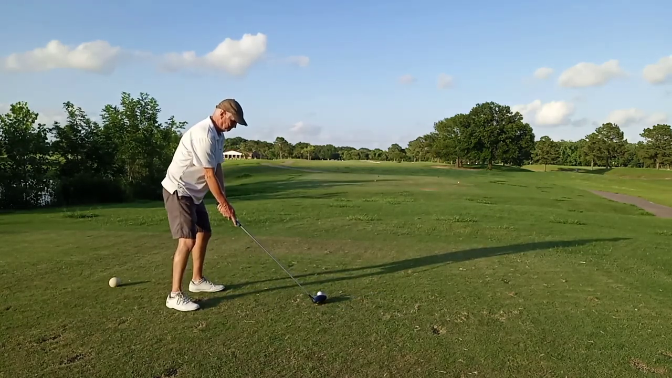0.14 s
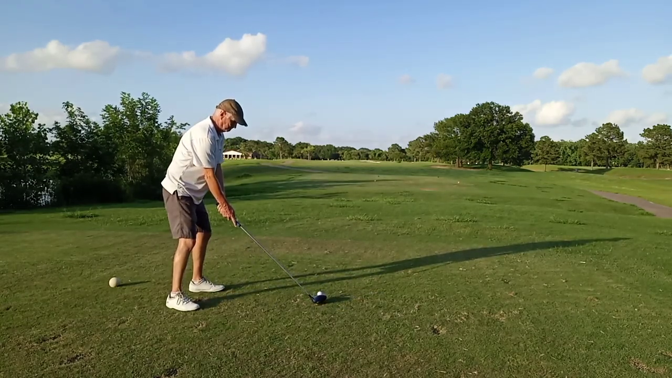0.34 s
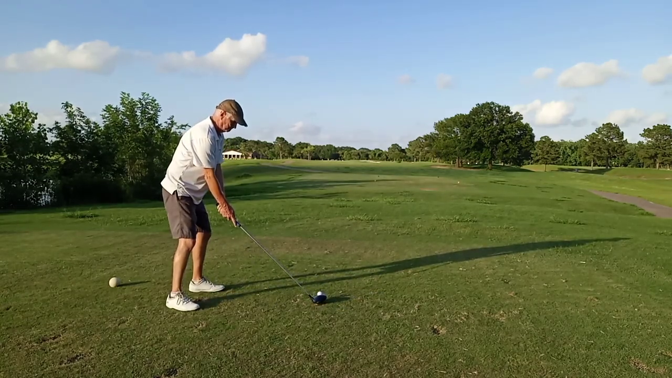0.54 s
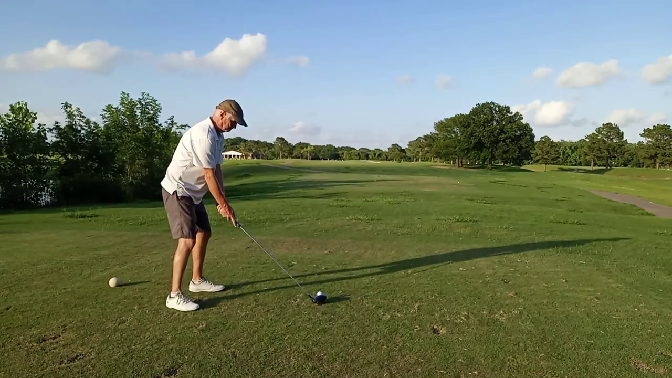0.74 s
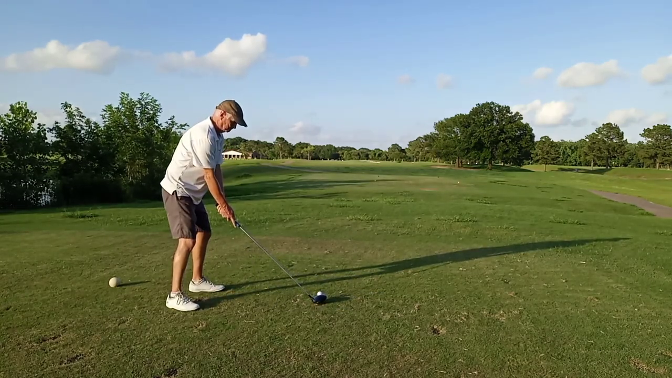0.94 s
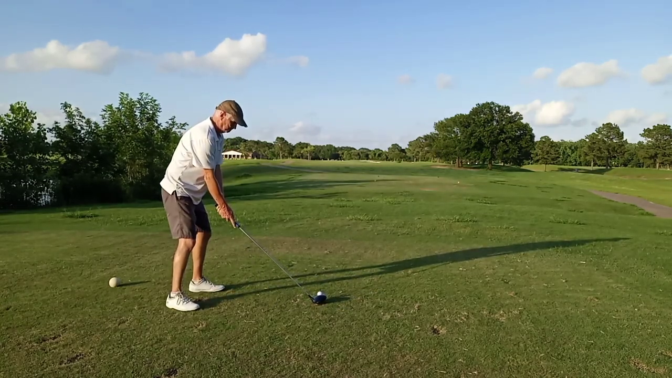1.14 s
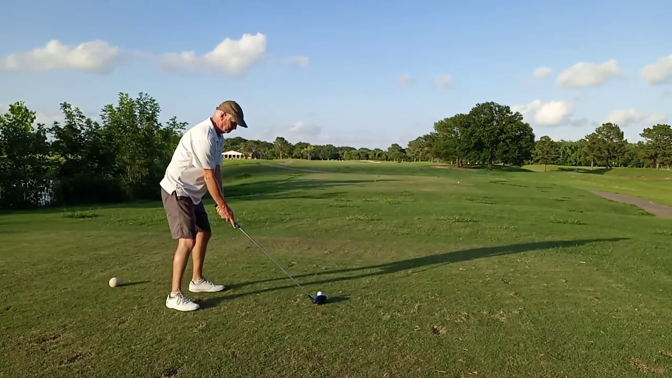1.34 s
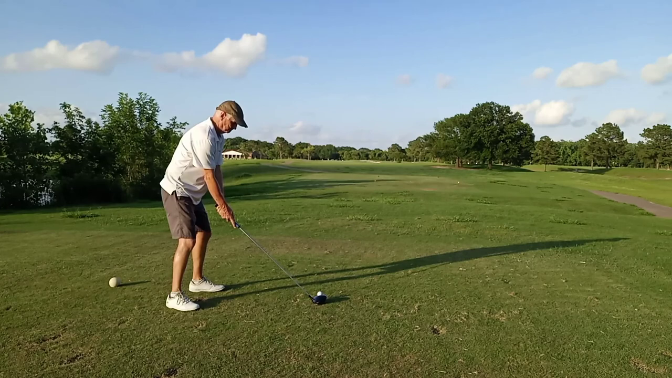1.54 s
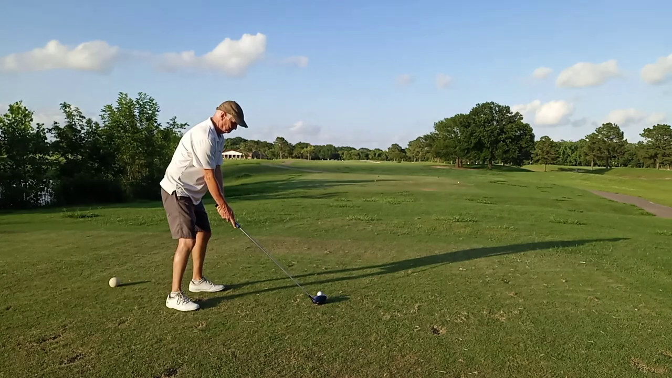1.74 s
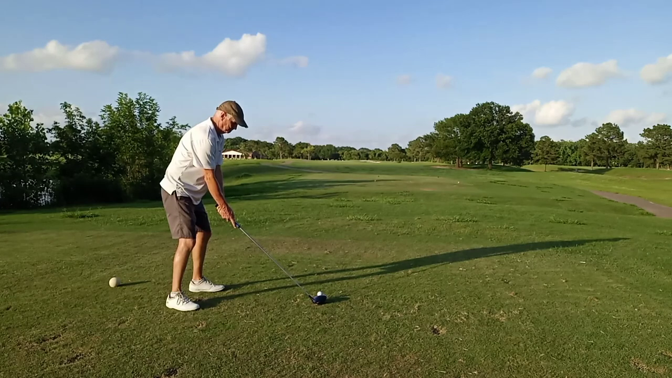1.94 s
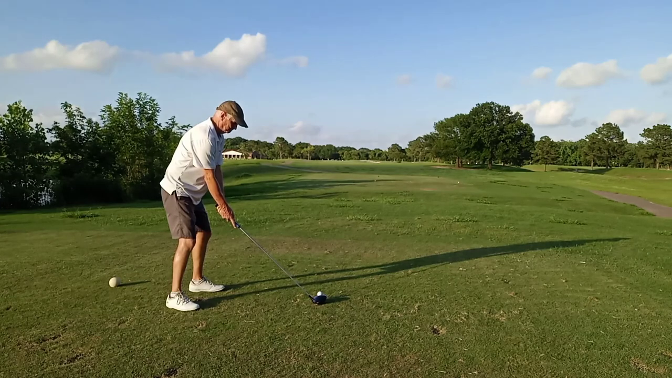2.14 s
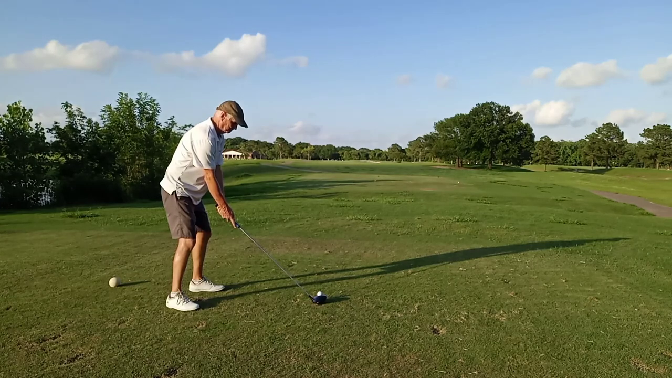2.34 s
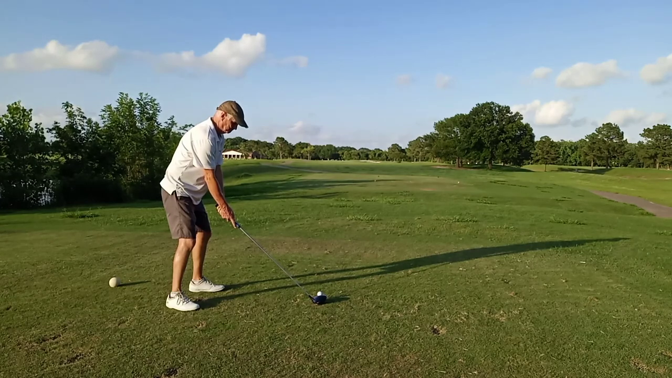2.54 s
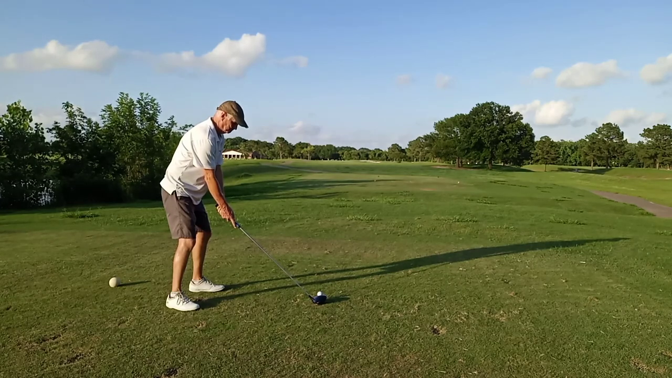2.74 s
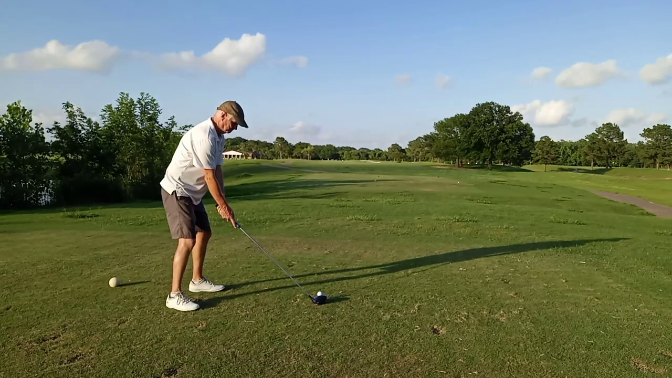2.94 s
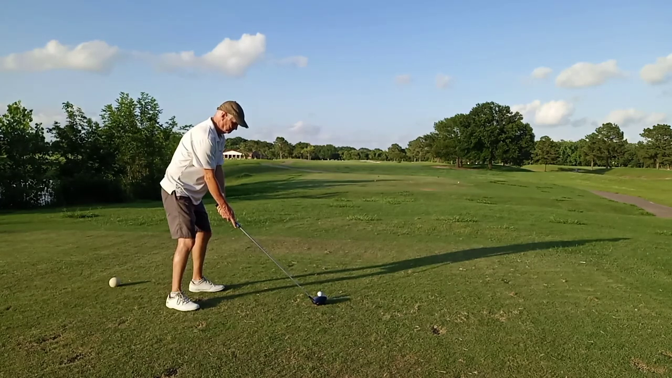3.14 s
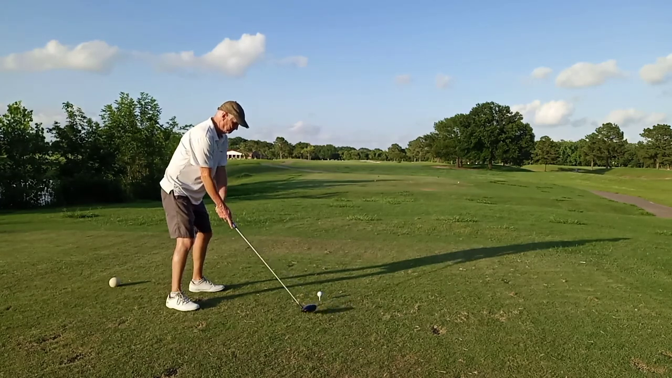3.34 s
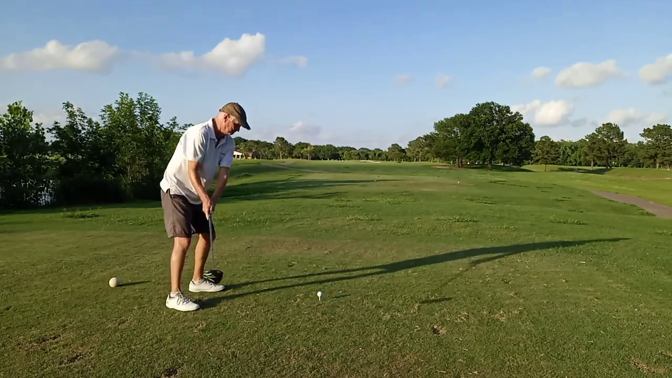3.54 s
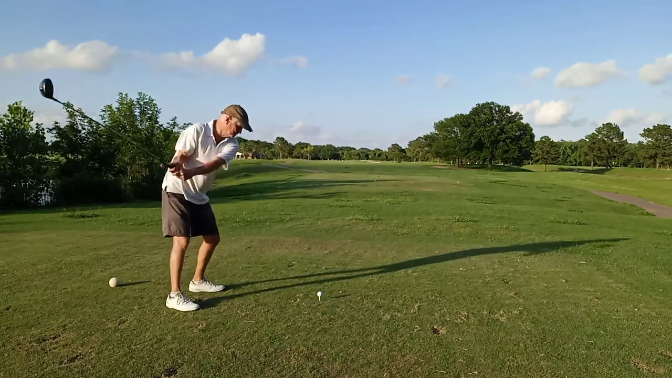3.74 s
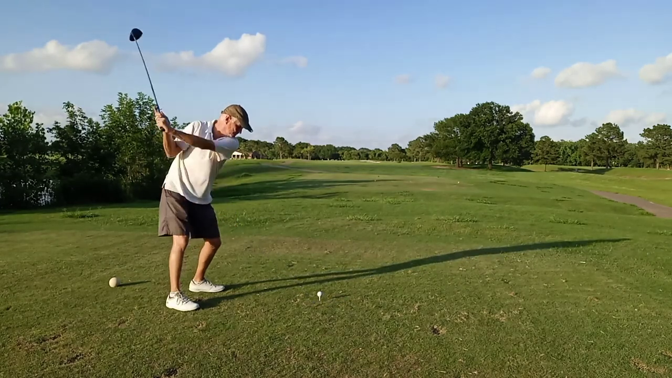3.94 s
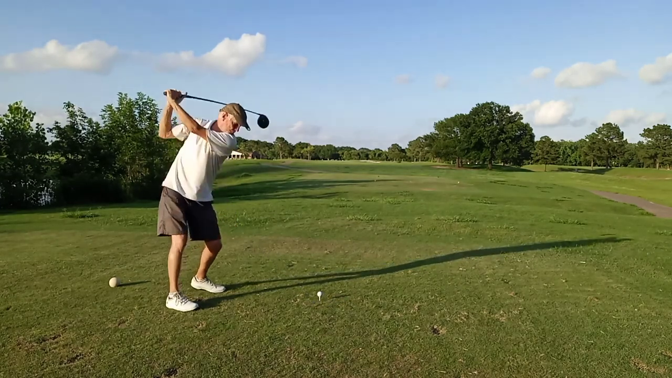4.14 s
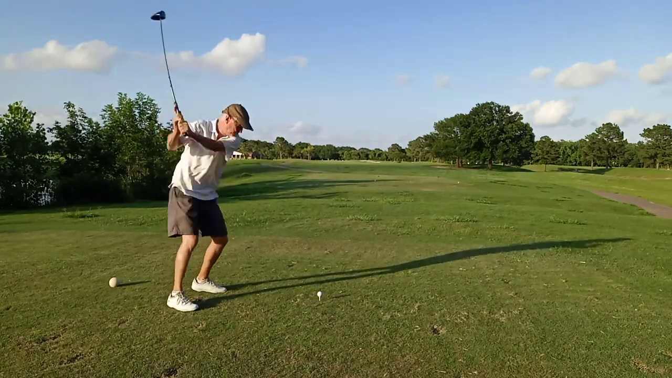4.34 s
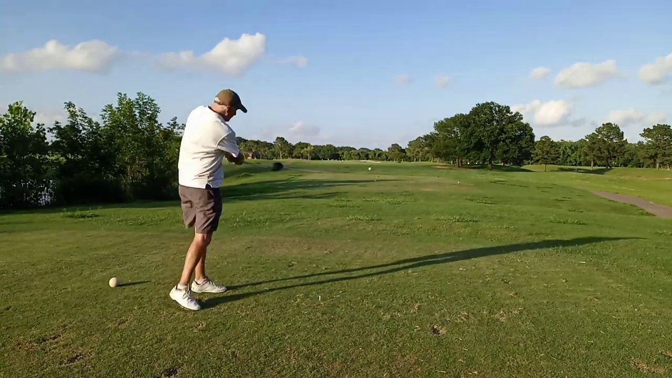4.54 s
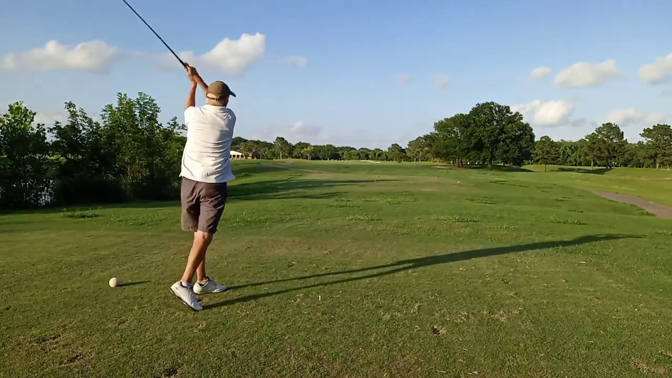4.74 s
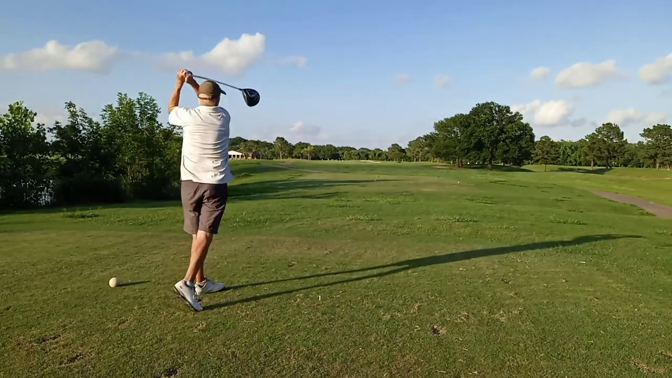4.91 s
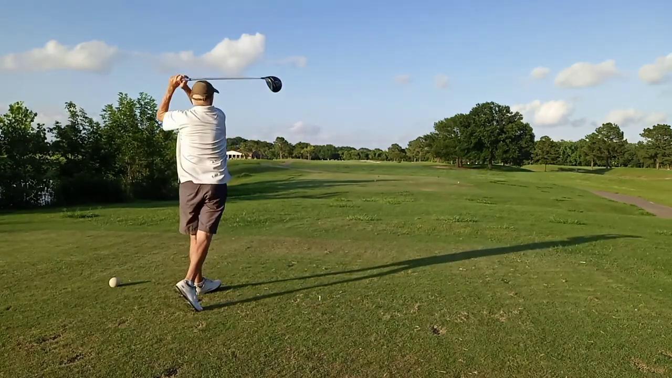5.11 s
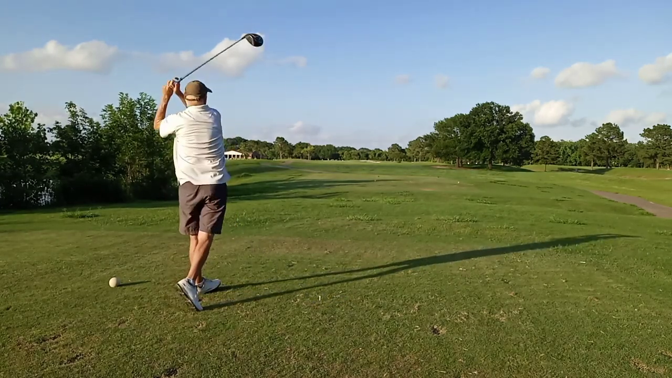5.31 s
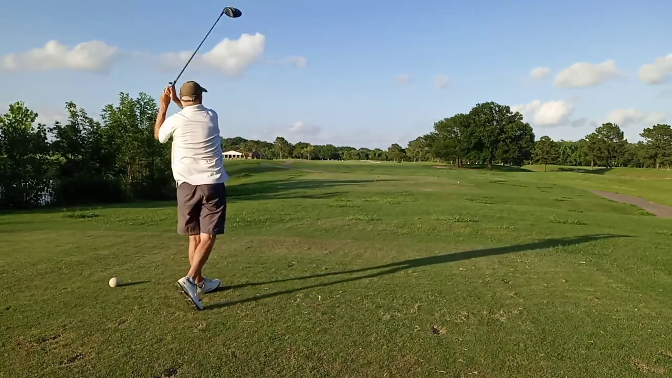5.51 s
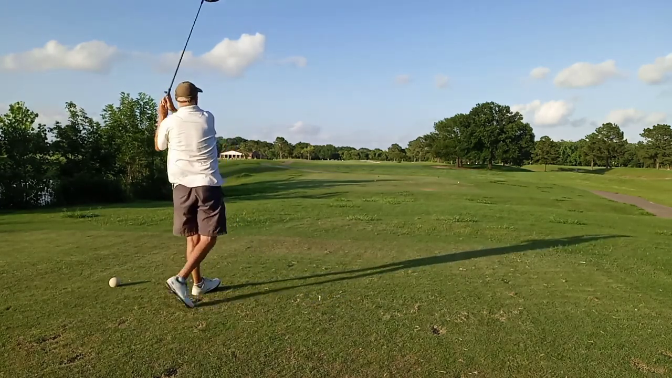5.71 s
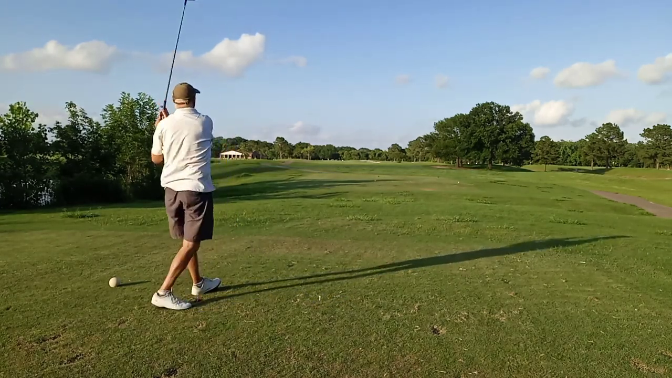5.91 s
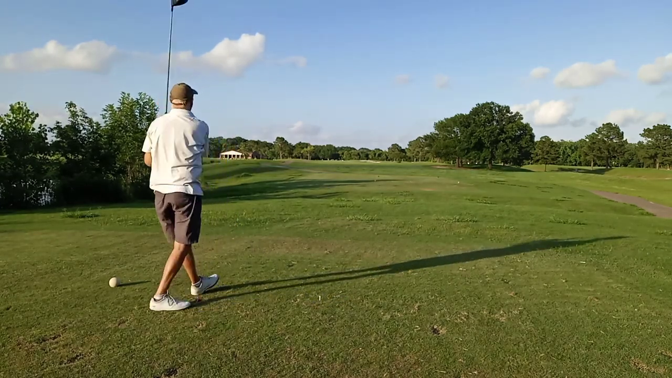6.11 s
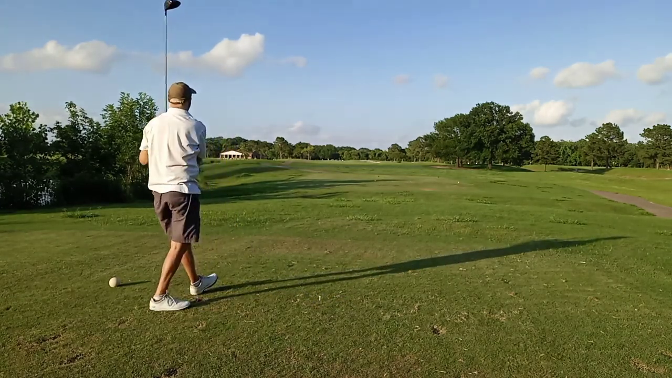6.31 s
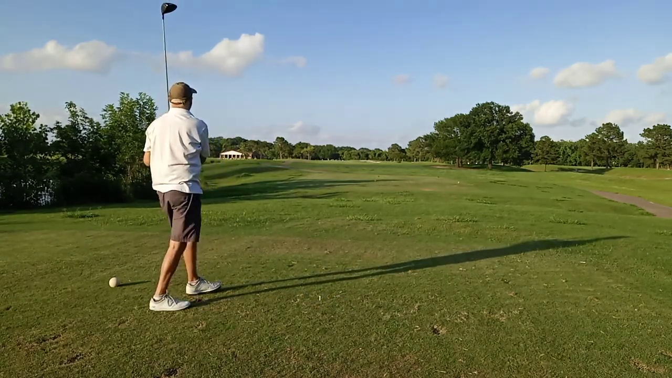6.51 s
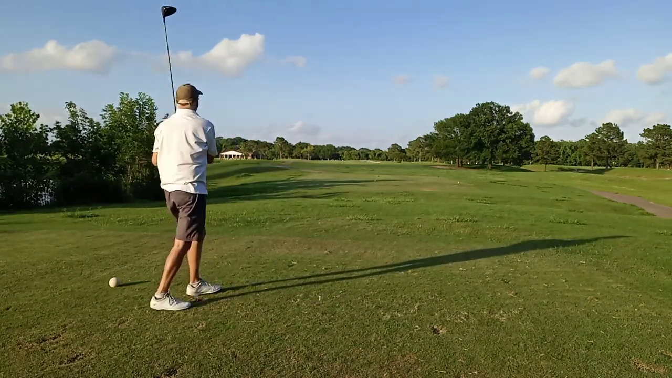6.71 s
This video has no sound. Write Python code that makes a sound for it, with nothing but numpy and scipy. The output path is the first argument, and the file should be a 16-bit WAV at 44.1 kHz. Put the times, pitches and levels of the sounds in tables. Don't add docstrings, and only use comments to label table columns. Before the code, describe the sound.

Outdoors on a golf tee, insects buzz softly under low traffic rumble while a close bird sings rapid twittering phrases, then stops. Shoes and club tick faintly in grass. A brief upward whoosh ends in a sharp hollow-metal ball strike that momentarily ducks the background and rings off bushes and trees. Birdsong returns with soft rustles, distant drooping whistles and a small motor drawing nearer. A modest camera microphone trims the highest treble.

```python
import sys
import numpy as np
from scipy import signal
from scipy.io import wavfile
from scipy.ndimage import uniform_filter1d

SR = 44100
rng = np.random.default_rng(int(sys.argv[2]) if len(sys.argv) > 2 else 0)


def voltage_ratio(level):
    return 10 ** (np.asarray(level, float) / 20)


def to_wav(s):
    ch = np.atleast_2d(s).T
    pcm = np.round(np.clip(ch, -1, 1) * 32767)
    wavfile.write(sys.argv[1], SR, pcm.astype(np.int16))


N = 298303
TIME = np.arange(N) / SR

IMPACT_S, CONTACT_S, BLOW_DB = 4.5688, .00192, -5.5
# (frequency [Hz], level [dB], t60 [s])
HEAD_MODES = [(3433, -24, .13), (4090, -29.5, 0.067), (4380, -28.5, 0.08), (4660, -25, 0.045),
              (5160, -24, .2), (5500, -24, 0.078), (5660, -14.5, .03), (6100, -29, .06),
              (5900, -39.5, 0.28), (6260, -26, 0.065), (6780, -21, .05), (6740, -36, 0.029),
              (7840, -45, 0.064), (8300, -53, 0.014)]
# (time after impact [s], factor [1])
HEAD_DOPPLER = [(0, .997), (.03, 1.002), (.06, 1.03), (.1, 1.06), (.3, 1.07)]
# (time after impact [s], factor [1])
TREE_DOPPLER = [(0, 1.1), (.012, 1.075), (.03, 1.04), (.06, 1.0), (.3, 1.0)]
WOBBLE_DB, WOBBLE_HZ = 3.5, 120
BUSHES_S, BUSHES_DB = 0.044, -7.5
TREE_LINE_S, TREE_LINE_DB, TREE_DEPTH_S = 0.13, -12, 0.014
WOOD_DB, WOOD_T60_S = 1.5, 0.65

# (time [s], head speed [m/s])
SWING = [
    (4.43, 17),
    (4.47, 24.7),
    (4.49, 31.3),
    (4.51, 38.5),
    (4.53, 37),
    (4.55, 40.3),
    (4.568, 43.5),
]
IMPACT_SPEED_M_S, STROUHAL, SHAFT_M = 45, .2, .011
SHAFT_DB, SHAFT_POWER, HEAD_DB, HEAD_POWER = -31, 5.34, -42, 5.3

# (middle [s], effort [dB], end pitch [Hz])
RISES = [(-.008, -0.5, 3300), (0.249, -2.5, 3307), (0.497, 0, 3337), (.751, 0, 3310), (1.021, -0.5, 3327),
         (1.285, -2.5, 3404), (1.559, -2, 3390), (4.905, -5.5, 3390), (5.176, -3, 3190),
         (5.432, -1.5, 3260), (5.681, -3.5, 3304), (5.944, -3, 3220), (6.208, -4, 3275),
         (6.474, -2.5, 3220)]
# (flick top [s], effort [dB], flutter [Hz], top [Hz])
FLICKS = [(0.086, -7, 4280, 5150), (0.344, -5, 4134, 4830), (.597, -2, 4130, 5090), (0.847, -2, 4205, 5370),
          (1.117, -2.5, 4055, 4670), (1.385, -3.5, 4144, 4940), (1.658, -3.5, 4204, 4950),
          (5.006, -6.5, 4000, 4650), (5.268, -4.5, 4200, 4570), (5.529, -5, 3920, 4860),
          (5.781, -3, 3970, 5116), (6.042, -2.5, 3770, 4240), (6.308, -5.5, 4080, 5050),
          (6.574, -6.5, 4135, 5020)]
# (middle of low rise [s], effort [dB], pitch factor [1])
CLOSINGS = [(0.139, -1.5, 1.0), (.392, 1, 1.007), (0.641, 2, 1.026), (0.903, 2.5, 0.99), (1.166, 1, 1.013),
            (1.427, 0, 1.024), (1.709, 0, 1.003), (5.062, 0, 1.01), (5.322, 2.5, 1.01), (5.575, 2.5, 1.0),
            (5.832, 1.5, 0.98), (6.097, 0.5, .99), (6.357, 1.5, 1.003), (6.625, 0, 1)]
# (time [s], effort [dB], pitch factor [1])
LONE_FALL = (4.797, -4, 0.99)
# (middle after the row's time [s], length [s], start, middle, end pitch / row pitch [1])
LOUD_RISE, FLUTTER = (0, .02, .865, .96, 1.005), (-.027, .022, .97, 1.0, 1.015)
LOW_RISE, FALL = (-.004, .024, .9, .975, 1.01), (.039, .019, 1.04, 1.0, .935)
LOW_RISE_HZ, FALL_HZ = 2538, 2783
LOUD_RISE_DB, FLUTTER_DB, LOW_RISE_DB, FALL_DB = -41.5, -47.5, -49.5, -48
PLUNGE_S, PLUNGE_END_HZ, TOP_DB, PLUNGE_DB = .021, 3017, -53, -46.5

# (time [s], length [s], start pitch [Hz], level [dB])
WHISTLES = [
    (0.232, 0.084, 2010, -67),
    (4.163, 0.26, 2353, -74.5),
    (4.857, 0.041, 3160, -59),
    (4.886, 0.19, 2400, -64),
    (5.348, .11, 2170, -65),
    (5.752, 0.12, 2120, -65.5),
    (6.163, .13, 2100, -66),
    (6.586, 0.11, 2140, -63.5),
]
SAG_MIDDLE, SAG_END = .865, .765
# (time [s], length [s], pitch [Hz], level [dB])
PEEPS = [
    (.925, .031, 7410, -70.5),
    (4.225, 0.062, 7280, -72),
]

# (time [s], peak [dB], low
# edge [Hz], high edge [Hz], t60 [s])
RUSTLES = [(2.8, -76, 5700, 7700, 0.49), (6.443, -72, 5900, 6860, 0.93), (6.452, -72.5, 6860, 7500, 0.85),
           (3.387, -61.5, 6500, 7560, 0.054), (3.388, -58.5, 4840, 4880, 0.061),
           (3.388, -62, 5450, 5540, 0.056), (3.39, -64.5, 1510, 4500, 0.077),
           (4.035, -68, 2500, 7500, 0.018), (4.254, -61, 1200, 5950, 0.0099),
           (4.607, -47, 1110, 2750, 0.045), (5.234, -52, 3500, 7960, 0.0058), (5.597, -59, 910, 7500, 0.08),
           (5.621, -59, 920, 7350, .06), (5.642, -65, 900, 7400, 0.057), (5.665, -68, 920, 7450, 0.062),
           (6.5, -65.5, 400, 1440, 0.57)]

# (time [s], level [dB], centre [Hz])
CHOIR = [(0, -58, 3105), (.8, -63.5, 3213), (1.6, -59.5, 3378), (2.6, -61.5, 3280), (3.0, -66.5, 3220),
         (3.5, -63, 3050), (3.8, -73, 3254), (5.2, -76, 3256), (6.0, -60, 3333), (6.76, -63, 3240)]
SHRILL_DB, SURGE_S = -85, 0.51
# (time [s], swell [dB])
SURGES = [
    (1.5, 7),
    (3.2, 6),
    (5.3, 8),
]

# (frequency [Hz], level [dB per Hz])
AIR = [(15, -61.5), (25, -36), (48, -15), (100, 5.5), (135, 1.5), (200, -5), (340, -18.5), (600, -30.5),
       (1270, -29), (2170, -37.5), (3290, -35.5), (4500, -41.5), (6520, -41), (8530, -65.5)]
# (frequency [Hz], width [Hz], level [dB])
HUM = [(69.6, 14, -6.5), (101.8, 13, -7.5), (130.3, 17, -3.5), (190.2, 14, -14), (647.6, 160, -26.5),
       (852, 130, -20.5)]
# (time [s], rumble level [dB])
ENGINES = [(0, -49), (.4, -55), (1.1, -55.5), (1.9, -54.5), (2.2, -53.5), (2.75, -57), (3.35, -51.5),
           (3.6, -54), (4.3, -56), (5.1, -50.5), (5.45, -53), (5.7, -49.5), (6.15, -53.5), (6.76, -51)]
# (time [s], whine level [dB])
MOTOR = [
    (0, -77),
    (1, -86),
    (4.6, -82),
    (4.9, -70.5),
    (5.55, -69),
    (5.75, -64.5),
    (6.15, -62),
    (6.76, -65.5),
]
GUST_DB, WANDER, GUSTY_ABOVE_HZ = 3.3, .05, 500

DUCK_DB, LOOK_AHEAD_S, RELEASE_S = -30.5, 0.015, .026


def evened(x):
    return x / np.sqrt(np.mean(x ** 2) + 1e-20)


def curve(rows, column):
    rows = np.array(rows)
    return np.interp(TIME, rows[:, 0], rows[:, column])


def add(mix, s, sound):
    part = mix[round(s * SR):][:len(sound)]
    part += sound[:len(part)]


def band(x, low_hz, high_hz, order=2):
    return signal.sosfilt(signal.butter(order, [low_hz, high_hz], "band", fs=SR, output="sos"), x)


def resonate(x, hz, width_hz):
    turn = np.exp(2j * np.pi * np.cumsum(hz * np.ones(len(x))) / SR)
    r = np.exp(-np.pi * width_hz / SR)
    once = signal.lfilter([1 - r], [1, -r], x / turn)
    twice = signal.lfilter([1 - r], [1, -r], once)
    return evened((turn * twice).real)


def scatter(level_db):
    taps = np.zeros(len(level_db))
    at = np.arange(0, len(taps) - 16, 16)
    taps[at + rng.integers(0, 16, len(at))] = rng.choice([-1., 1.], len(at))
    return taps * voltage_ratio(level_db) / np.sqrt(SR / 16 / 20)


def strike():
    out, t = np.zeros(N), np.arange(round(.7 * SR)) / SR
    ring_t = t[:SR // 4]
    pulse = -voltage_ratio(BLOW_DB) * np.sin(np.pi * np.minimum(t / CONTACT_S, 1)) ** 2
    blow = signal.sosfilt(signal.butter(2, 95, "high", fs=SR, output="sos"), pulse)
    add(out, IMPACT_S, blow)
    add(out, IMPACT_S, ring(np.interp(ring_t, *np.transpose(HEAD_DOPPLER))))

    toward = np.interp(ring_t, *np.transpose(TREE_DOPPLER))
    sent = sum(ring(toward * bearing) for bearing in (.985, 1., 1.02))
    sent -= .65 * band(sent, 1300, 3100, order=1)
    add(out, IMPACT_S, voltage_ratio(-13.5) * signal.fftconvolve(sent, scatter(trees(t))))

    trunks = scatter(-24 - 60 * t / 2.1 - 30 * np.exp(-(t / 0.12) ** 3))
    add(out, IMPACT_S, signal.fftconvolve(band(blow[:SR // 4], 650, 2200), trunks))
    return out


def ring(factor):
    t = np.arange(SR // 4) / SR
    bent_s = np.cumsum(factor * np.ones(len(t))) / SR
    wobble = [evened(band(row, 24, WOBBLE_HZ, order=1)) for row in rng.standard_normal((3, len(t)))]
    wobble_db = WOBBLE_DB * np.minimum(t / 0.049, 1)
    modes = np.zeros(len(t))
    for k, (hz, db, t60) in enumerate(HEAD_MODES):
        level = voltage_ratio(db - 60 * t / t60 + wobble_db * wobble[k % 3])
        modes += level * np.sin(2 * np.pi * (hz * bent_s + rng.random()))
    crack = evened(band(rng.standard_normal(len(t)), 1200, 4000, order=1)) * voltage_ratio(-18 - 60 * t / 0.013)
    crowd = evened(band(rng.standard_normal(len(t)), 4000, 8400))
    crowd *= voltage_ratio(-25 - 60 * t / 0.0056) + voltage_ratio(-39.5 - 60 * t / 0.12)
    return modes * (1 - np.exp(-t / 0.0015)) + crack + crowd


def trees(t):
    front = np.exp(-((t - TREE_LINE_S) / TREE_DEPTH_S) ** 2)
    behind = np.where(t < TREE_LINE_S, front, voltage_ratio(-60 * (t - TREE_LINE_S) / WOOD_T60_S))
    bushes = np.minimum(t / BUSHES_S, 1) ** 2.5 * (t < TREE_LINE_S)
    echo = voltage_ratio(BUSHES_DB) * bushes + voltage_ratio(TREE_LINE_DB) * front + voltage_ratio(WOOD_DB) * behind
    return 20 * np.log10(echo + 1e-9)


def swing():
    on = (TIME > SWING[0][0]) & (TIME < SWING[-1][0])
    speed = curve(SWING, 1)
    share = speed / IMPACT_SPEED_M_S
    shaft = resonate(rng.standard_normal(N), STROUHAL * speed / SHAFT_M, 320)
    head = evened(band(rng.standard_normal(N), 900, 6300, order=1))
    return on * (voltage_ratio(SHAFT_DB) * share ** SHAFT_POWER * shaft + voltage_ratio(HEAD_DB) * share ** HEAD_POWER * head)


def birds():
    song = np.zeros(N)
    near_bird(song)
    far_birds(song)
    t = np.arange(SR // 2) / SR
    bushes = scatter(-9 - 60 * t / 0.61 - 30 * np.exp(-t / 0.0014))
    echoes = signal.oaconvolve(song, bushes)[:N]
    return song + echoes + voltage_ratio(8.0) * band(echoes, 3120, 8000)


def near_bird(song):
    for s, effort_db, hz in RISES:
        note(song, s, hz, LOUD_RISE_DB + effort_db, LOUD_RISE)
    for s, effort_db, flutter_hz, top_hz in FLICKS:
        note(song, s, flutter_hz, FLUTTER_DB + effort_db, FLUTTER, flutter=0.54)
        sweep = flick(top_hz, PLUNGE_S, PLUNGE_END_HZ, TOP_DB + effort_db, PLUNGE_DB + effort_db)
        add(song, s - .0135, sweep)
    for s, effort_db, factor in CLOSINGS:
        note(song, s, factor * LOW_RISE_HZ, LOW_RISE_DB + effort_db, LOW_RISE)
        note(song, s, factor * FALL_HZ, FALL_DB + effort_db, FALL)
    s, effort_db, factor = LONE_FALL
    note(song, s, factor * FALL_HZ, FALL_DB + effort_db, FALL)


def far_birds(song):
    for s, length_s, hz, db in WHISTLES:
        sound = whistle(length_s, hz, SAG_MIDDLE * hz, SAG_END * hz, db, .3, flutter=.3)
        add(song, s, sound * voltage_ratio(np.linspace(3, -7, len(sound))))
    for s, length_s, hz, db in PEEPS:
        add(song, s, whistle(length_s, hz, 1.006 * hz, .99 * hz, db, .4))


def note(song, s, hz, db, shape, flutter=0.):
    after_s, length_s, *pitch = shape
    lead_s = .007
    start_s = s + after_s - length_s / 2 - lead_s
    sound = whistle(length_s, *(hz * np.array(pitch)), db, 1.0, lead_s=lead_s, flutter=flutter)
    add(song, max(start_s, 0), sound[max(round(-start_s * SR), 0):])


def whistle(length_s, start_hz, middle_hz, end_hz, db, edge, lead_s=0., flutter=0.):
    u = np.arange(-lead_s, length_s + lead_s, 1 / SR) / length_s
    hz = np.polyval(np.polyfit([0, .5, 1], [start_hz, middle_hz, end_hz], 2), u)
    swell = np.sin(np.pi * np.linspace(0, 1, len(u)) ** 1.24) ** edge
    shake = 1 + flutter * np.sin(2 * np.pi * (90 * u * length_s + rng.random()))
    return sing(hz, voltage_ratio(db) * swell * shake)


def flick(top_hz, fall_s, end_hz, top_db, fall_db, rise_s=0.013):
    t = np.arange(-rise_s, fall_s, 1 / SR)
    rise_hz = top_hz + 1000 * np.minimum(t, 0) / rise_s
    plunge_hz = end_hz + (top_hz - end_hz) * np.cos(np.pi / 2 * np.maximum(t, 0) / fall_s) ** 2.5
    level_db = np.interp(t, [-rise_s, 0, .3 * fall_s, .45 * fall_s, .7 * fall_s, fall_s],
                         [top_db - 8, top_db, top_db - 12, fall_db - 11, fall_db, fall_db - 3])
    return sing(np.where(t < 0, rise_hz, plunge_hz), voltage_ratio(level_db + 5.5) * signal.windows.tukey(len(t), .25))


def sing(hz, level):
    return level * np.sin(2 * np.pi * (np.cumsum(hz) / SR + rng.random()))


def rustles():
    out, t = np.zeros(N), np.arange(SR // 3) / SR
    for s, db, low_hz, high_hz, t60 in RUSTLES:
        burst = evened(band(rng.standard_normal(len(t)), low_hz, high_hz))
        add(out, s, voltage_ratio(db - 60 * t / t60) * burst)
    return out


def insects():
    clicks = rng.standard_normal((8, N)) * (rng.random((8, N)) < 1500 / SR)
    drift = [evened(band(row, 0.3, 1.5, order=1)) for row in rng.standard_normal((15, N))]
    centre_hz = curve(CHOIR, 2)
    strands = np.zeros(N)
    for k, offset_hz in enumerate(np.linspace(-330, 350, 7)):
        strand = resonate(clicks[k], centre_hz + offset_hz + 35 * drift[k + 7], 100)
        strands += voltage_ratio(2.0 * drift[k]) * strand

    throb = evened(band(rng.standard_normal(N), 7.4, 12))
    surge_db = sum(db * np.exp(-((TIME - s) / SURGE_S) ** 2) for s, db in SURGES)
    high = resonate(clicks[7], 6480 + 40 * drift[14], 380)
    return evened(strands) * voltage_ratio(curve(CHOIR, 1)) + high * voltage_ratio(SHRILL_DB + surge_db + 1.9 * throb)


def air():
    frames, hz = N // 512 + 5, np.fft.rfftfreq(2048, 1 / SR)
    a, b, patches = rng.standard_normal((frames, 1025, 3)).T
    patches = evened(uniform_filter1d(uniform_filter1d(patches, 16, 0), 8, 1))
    table_hz, table_db = np.transpose(AIR)
    level_db = np.interp(np.log(hz + 1), np.log(table_hz), table_db)
    z = (a + 1j * b) * voltage_ratio(level_db[:, None] + 3.34 * patches)
    return voltage_ratio(-54) * evened(signal.istft(z, nperseg=2048, noverlap=1536)[1][:N])


def engines():
    gust = [evened(band(row, 1.5, 7, order=1)) for row in rng.standard_normal((2, N))]
    bend = [evened(band(row, 1.5, 7, order=1)) for row in rng.standard_normal((2, N))]
    hum = np.zeros(N)
    for k, (hz, width_hz, db) in enumerate(HUM):
        gusty = hz > GUSTY_ABOVE_HZ
        track_hz = hz * (1 + gusty * WANDER * bend[k % 2])
        level = voltage_ratio(db + gusty * GUST_DB * (gust[k % 2] - .5))
        hum += level * resonate(rng.standard_normal(N), track_hz, width_hz)
    return voltage_ratio(curve(ENGINES, 1)) * hum


def motor():
    jitter_hz = 2.2 * evened(band(rng.standard_normal(N), 1.5, 8))
    whine = np.sqrt(2) * sing(334 + jitter_hz, 0.94)
    return voltage_ratio(curve(MOTOR, 1)) * (whine + .5 * resonate(rng.standard_normal(N), 310, 75))


def limiter():
    t = TIME - IMPACT_S
    dive = np.clip(1 + t / LOOK_AHEAD_S, 0, 1)
    return voltage_ratio(DUCK_DB * np.where(t < 0, dive, np.exp(-abs(t) / RELEASE_S)))


def scene():
    surroundings = swing() + birds() + rustles() + insects() + air() + engines() + motor()
    return (strike() + limiter() * surroundings)[None]


def band_limit(x):
    return signal.sosfilt(signal.butter(12, 8680, fs=SR, output="sos"), x)


def record(dry):
    cut = signal.sosfilt(signal.cheby1(10, .5, 8000, fs=SR, output="sos"), dry)
    hiss = voltage_ratio(-91) * rng.standard_normal(dry.shape)
    return band_limit(cut + hiss)


dry = scene()
out = record(dry)
to_wav(out)
```